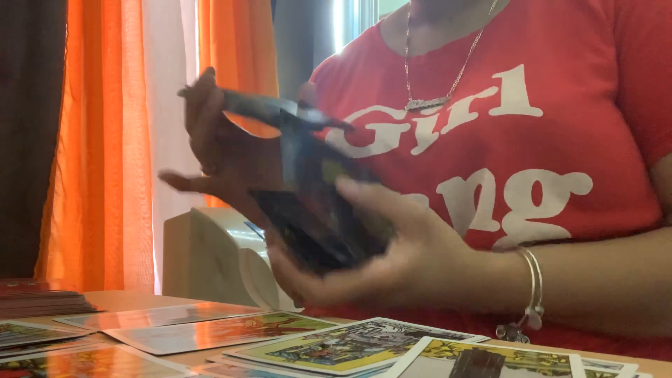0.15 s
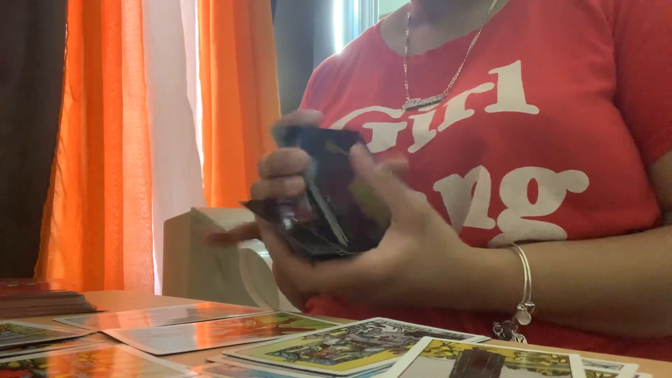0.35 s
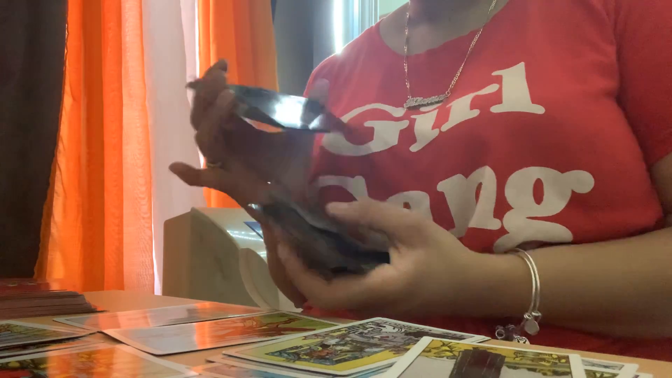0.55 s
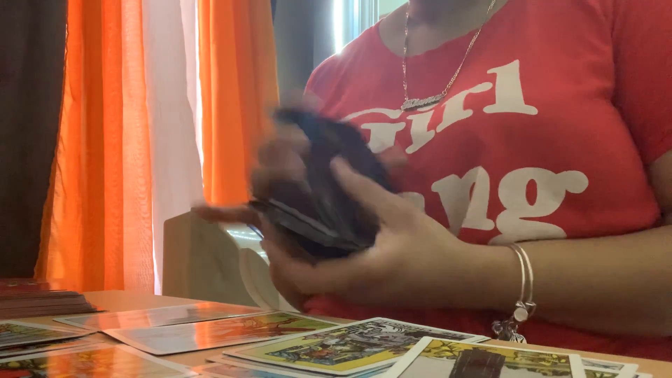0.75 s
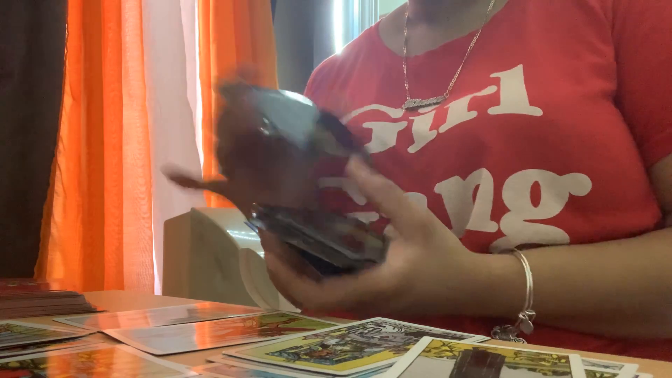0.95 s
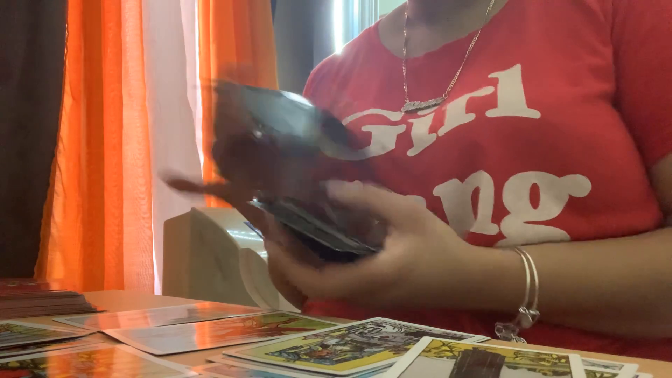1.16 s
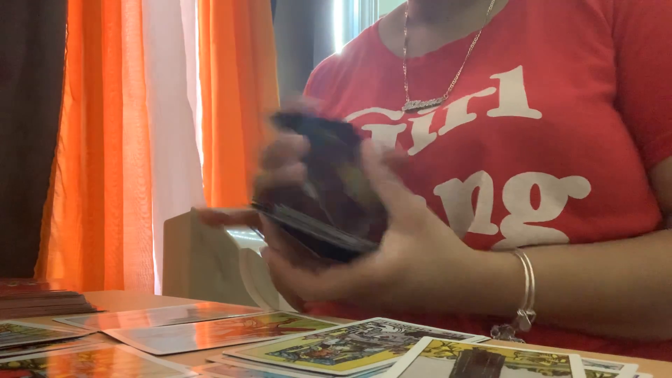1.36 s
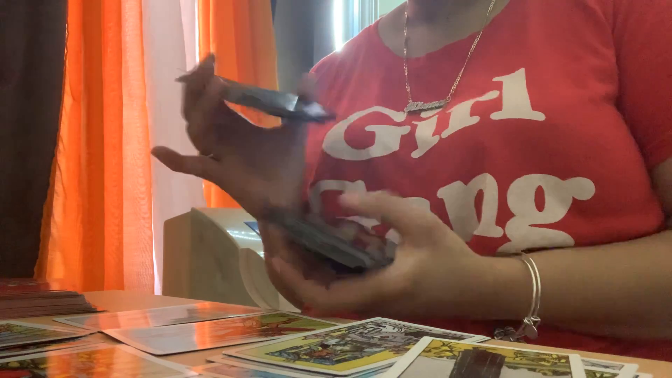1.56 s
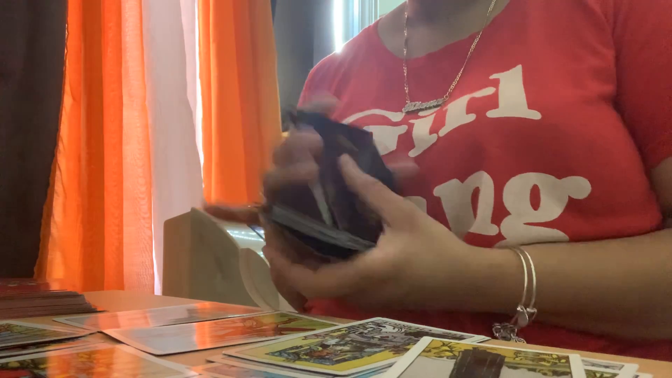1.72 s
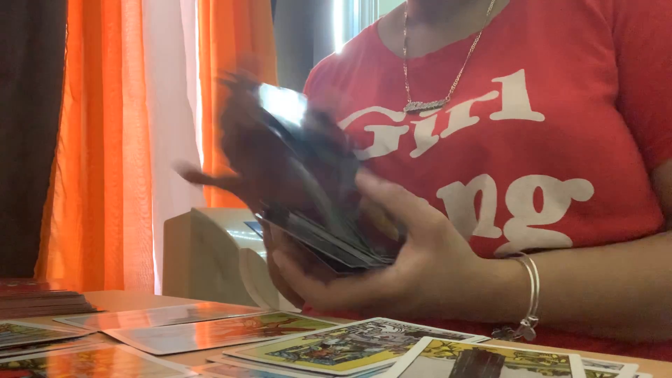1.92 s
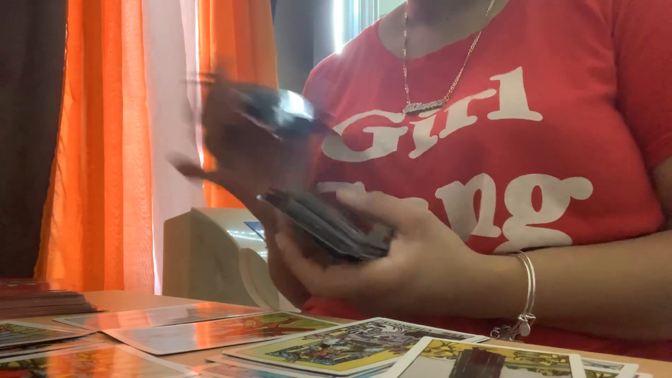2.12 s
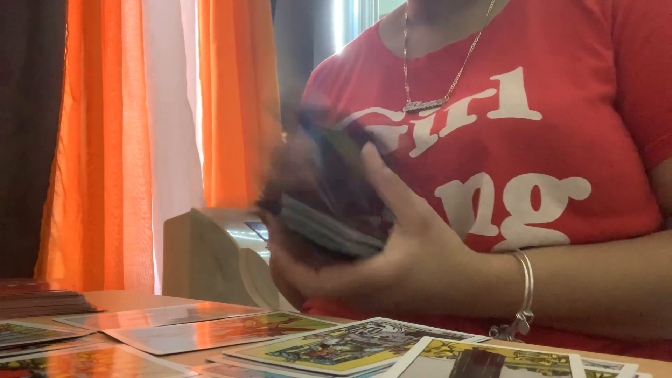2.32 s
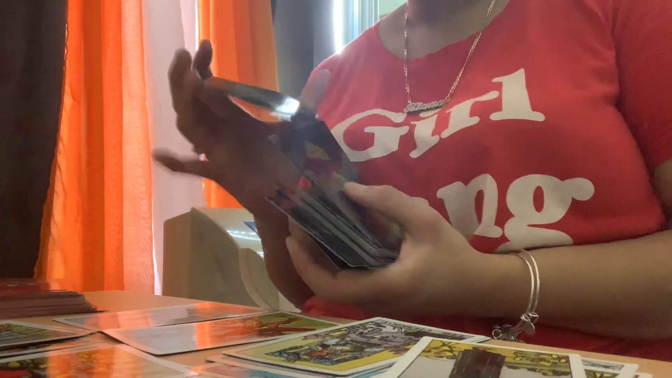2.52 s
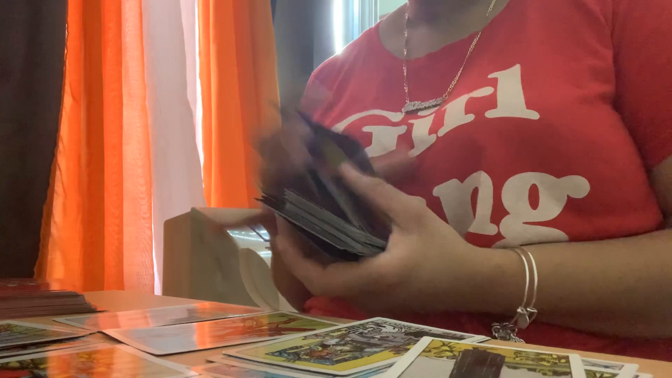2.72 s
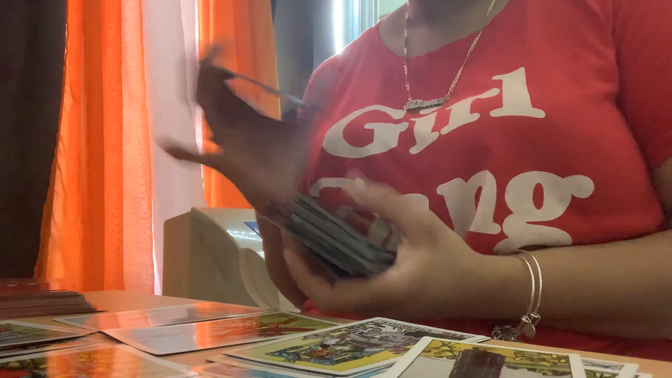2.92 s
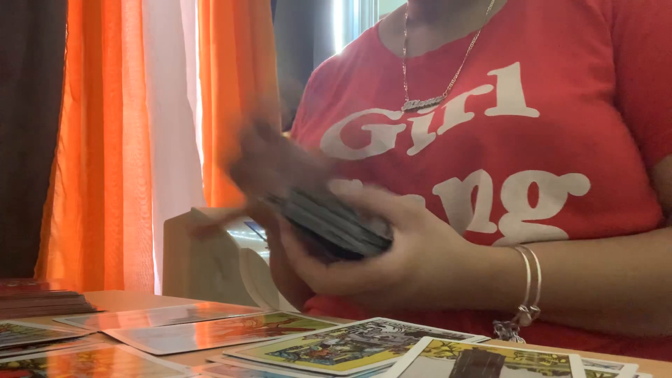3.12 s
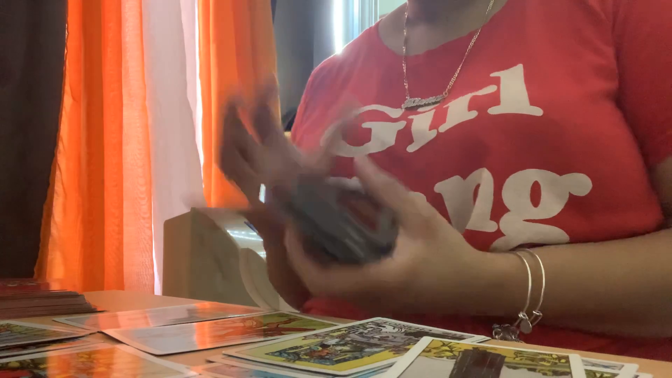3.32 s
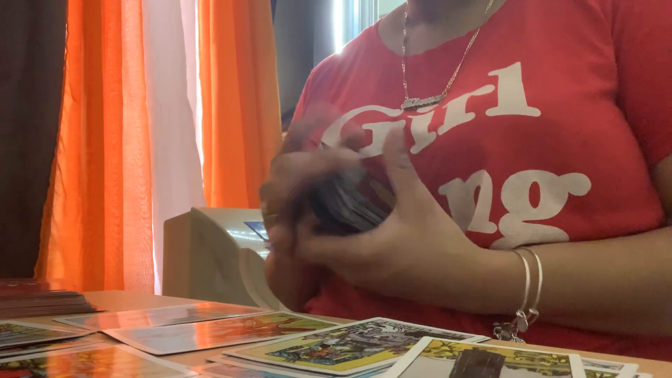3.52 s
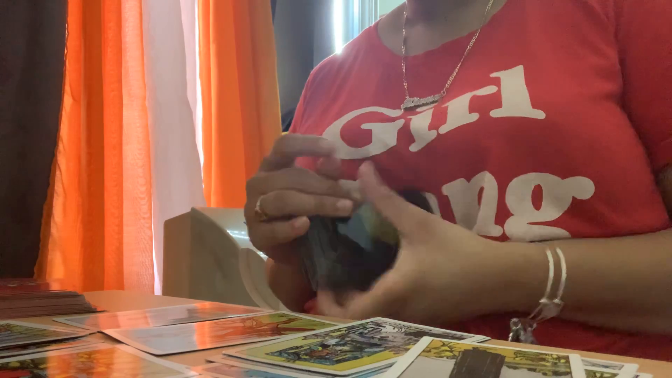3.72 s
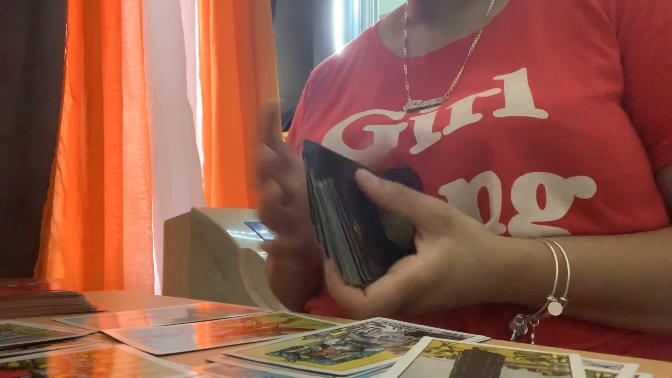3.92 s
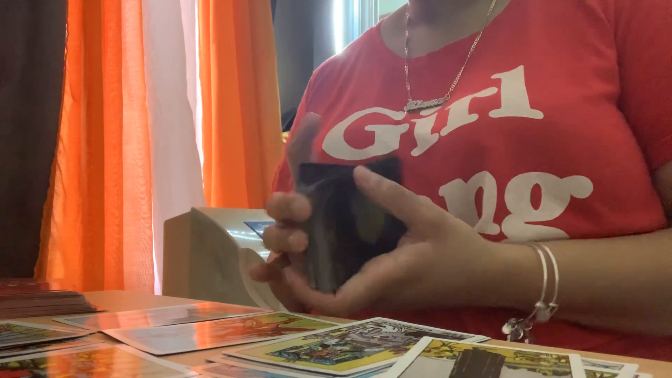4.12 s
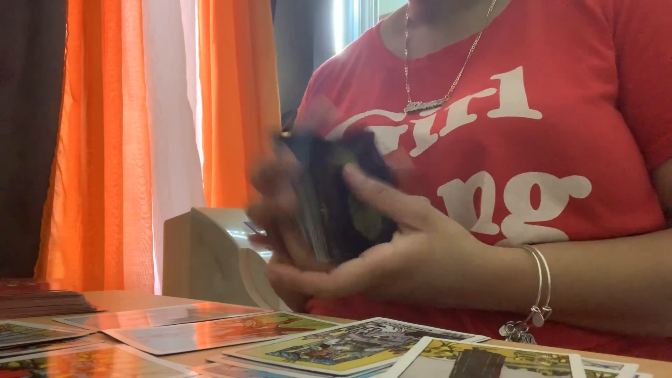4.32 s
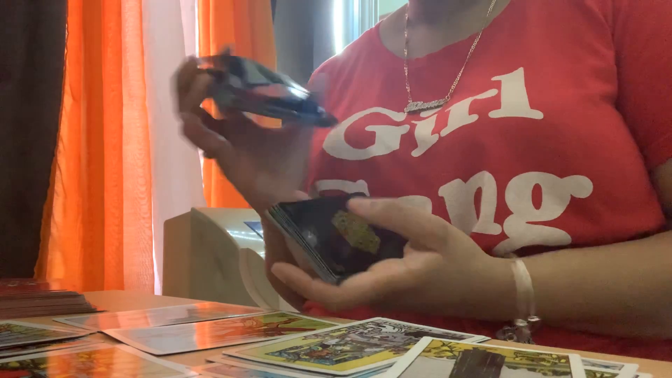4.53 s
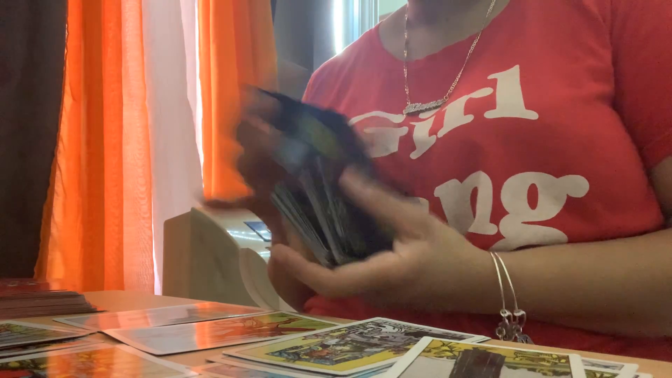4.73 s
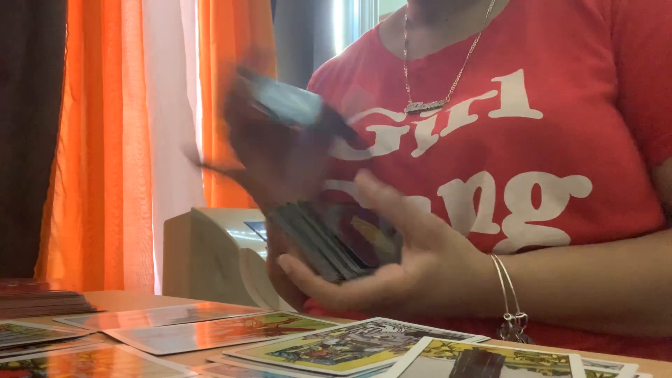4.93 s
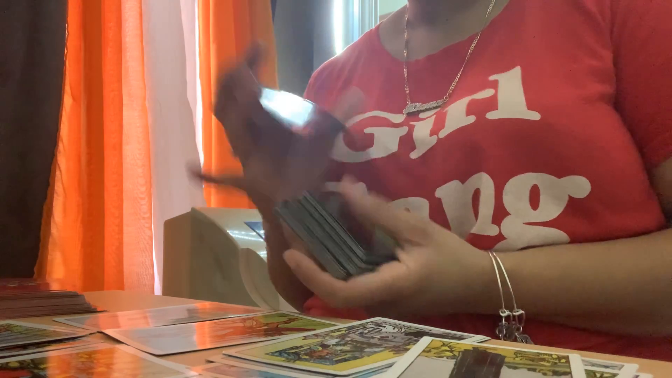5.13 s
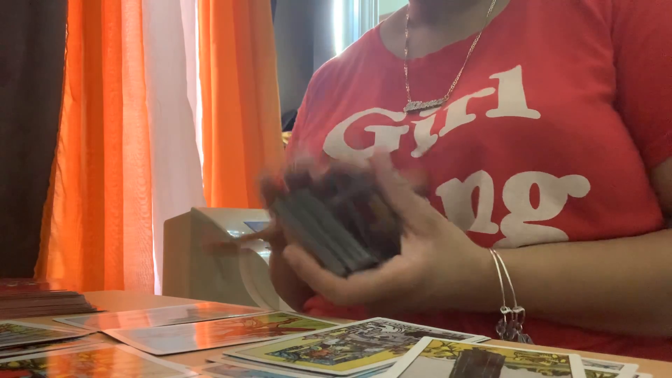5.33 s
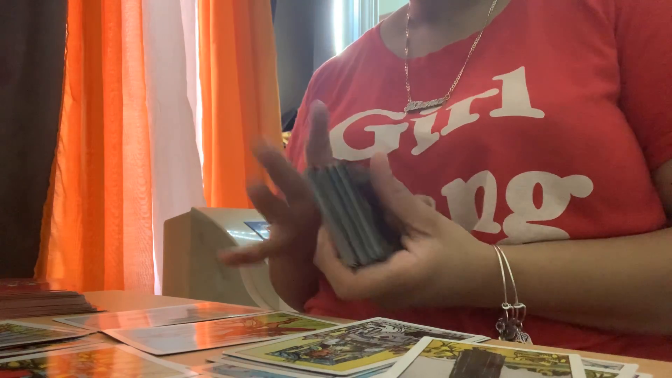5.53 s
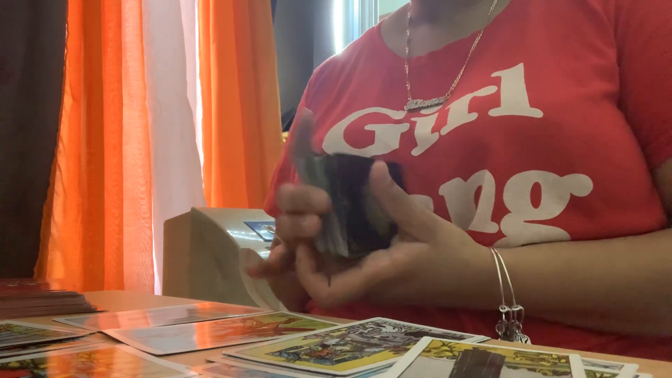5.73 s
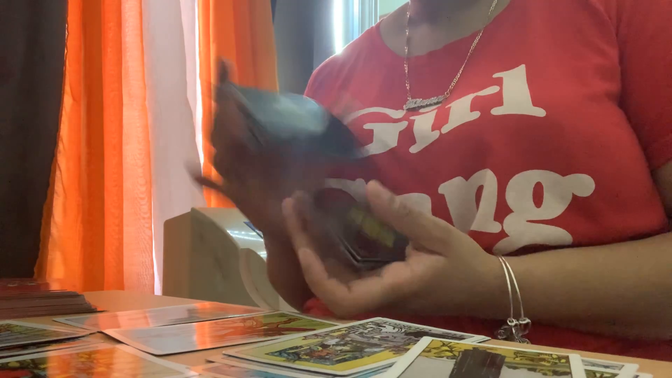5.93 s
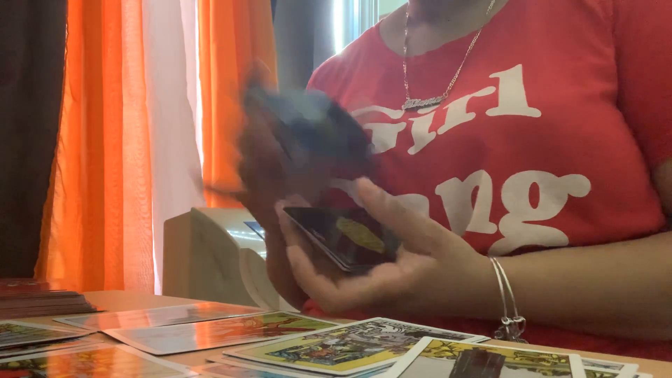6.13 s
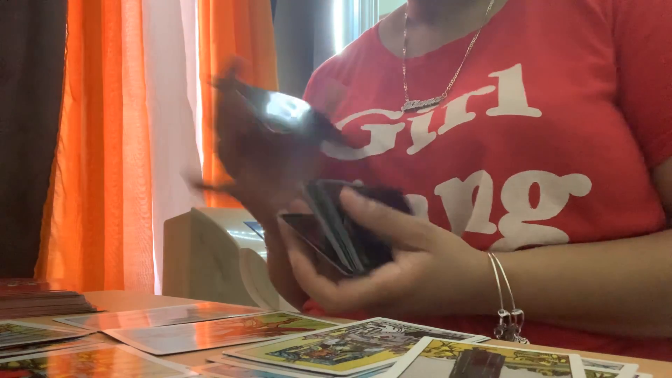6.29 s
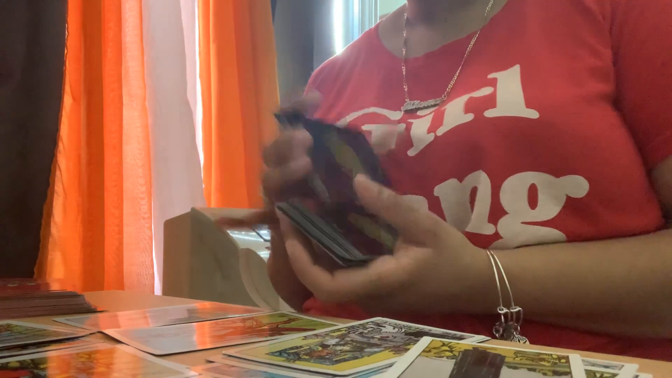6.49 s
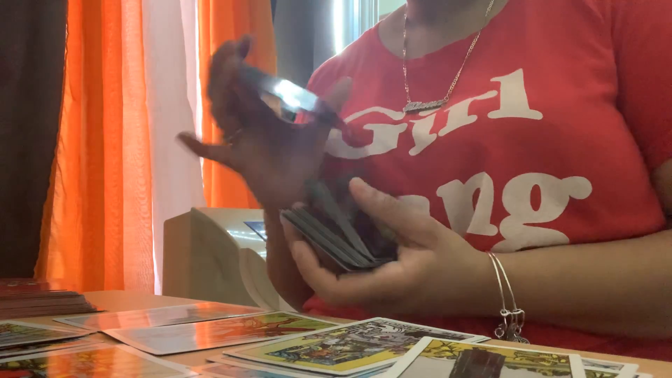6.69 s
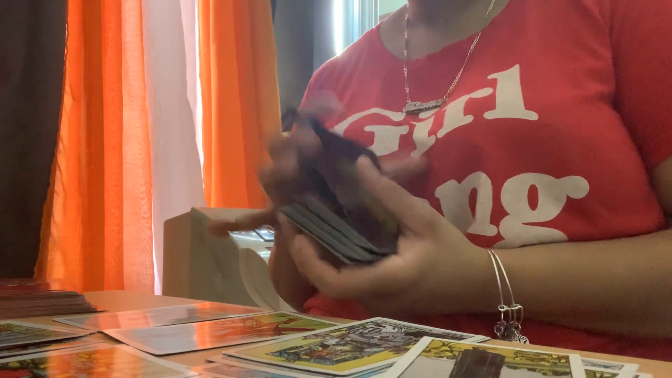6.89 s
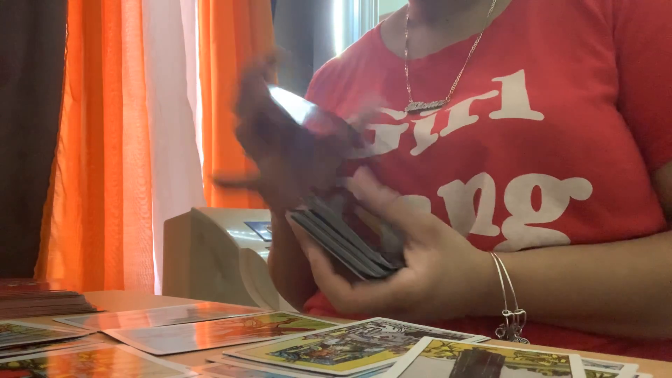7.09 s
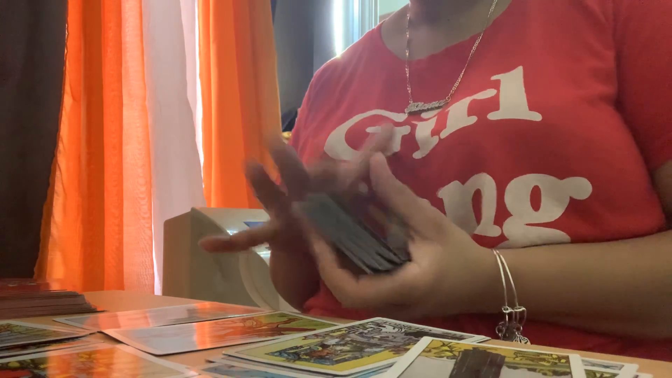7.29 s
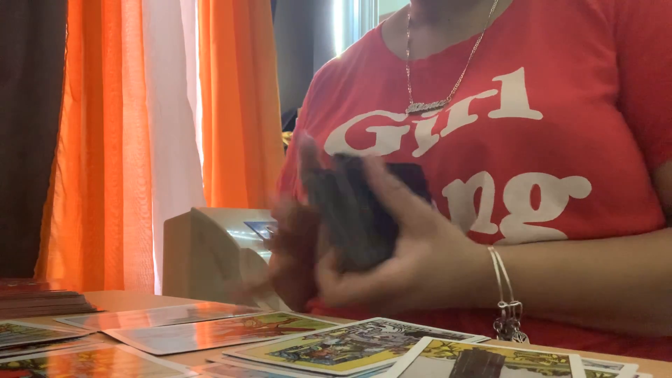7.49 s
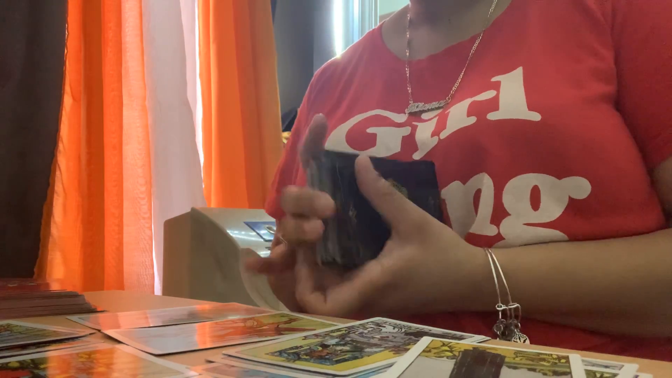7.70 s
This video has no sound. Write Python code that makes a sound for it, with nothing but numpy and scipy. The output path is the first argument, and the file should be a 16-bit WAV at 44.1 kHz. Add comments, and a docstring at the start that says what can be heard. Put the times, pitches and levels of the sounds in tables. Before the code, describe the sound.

A deck of large cards is shuffled overhand, close to the microphone in a small room with little echo. From the start until about 3.2 seconds the strokes come briskly, roughly three a second: a soft drag, a short papery hiss, then a crisp slap with a puff of air. Edges click in between, and now and then the deck thumps softly into the palm. The sharpest slap falls near 1.8 seconds. Another packet lands around 3.6 seconds, followed by a quieter stretch of soft rubs and tiny clicks. Loose cards scrape and patter down near 4.7, 5.1 and 5.4 seconds. After a lull, more packets and clicks come between 6.2 and 7.3 seconds, and the deck is gathered with gentle rubs until about 7.7 seconds. Underneath lie still room air, a faint electrical hum and a slight low rumble of moving arms.

```python
"""Large cards are shuffled overhand, close up in a small room. For the first three seconds the strokes
come briskly: the thumb drags, a packet whips off with a hiss and slaps onto the pile with a puff of air,
and at times the deck thumps into the palm. Then the pace eases: loose cards patter down, edges click
and the deck is squared with soft rubs. A last few packets land after six seconds, and the hands gather
the deck. Under it all lie still air, a faint mains hum and the rumble of moving arms."""
import sys
import numpy as np
from scipy import signal
from scipy.fft import rfft, irfft
from scipy.io import wavfile

SR = 44100
rng = np.random.default_rng(int(sys.argv[2]) if len(sys.argv) > 2 else 0)


def pcm_store(signal):
    """Save signal as 16-bit PCM."""
    levels = np.round(np.clip(np.atleast_2d(signal), -1, 1) * 32767)
    wavfile.write(sys.argv[1], SR, levels.astype(np.int16).T)


N = 341775
TIME = np.arange(N) / SR

# Packets landing flat on the pile. Each row: time in seconds, crack in dB, air pop in dB,
# the pop's nominal pitch in Hz, palm thud in dB.
FLAT_LANDINGS = [(.2656, -41, -50, 1585, -56), (.3505, -60, -45.5, 800, -62),
                 (.3658, -37.5, -41.5, 1014, -52.5), (.5208, -29.5, -35.5, 745, -42),
                 (.6928, -43, -43.5, 1470, -66), (1.0688, -31, -34, 890, -45),
                 (1.1694, -31, -31.5, 1310, -49.5), (1.5002, -34.5, -27.5, 794, -37),
                 (1.8125, -21.5, -34, 850, -50.5), (1.9997, -32.5, -35.5, 1274, -74),
                 (2.7905, -41.5, -35.5, 1530, -50), (3.0738, -48, -42, 1515, -62),
                 (3.1432, -39.5, -41.5, 997, -40.5), (3.1528, -42, -40, 796, -41.5),
                 (3.5675, -44, -37, 880, -77), (3.5755, -54, -41, 796, -54), (4.7708, -53, -42, 853, -49),
                 (5.0686, -39, -38.5, 1524, -46.5), (5.3504, -38, -45, 1265, -53.5),
                 (6.2209, -35.5, -51, 1560, -46.5), (7.2094, -37.5, -40.5, 1470, -49.5),
                 (7.2271, -37.5, -42.5, 1576, -54)]
# Loose cards scraping out of the fingers and tapping down. Each row: start and end in seconds,
# taps in dB, scrape in dB, the scrape's brightness in dB per octave.
LOOSE_LANDINGS = [(0, 0.018, -44.5, -57.5, -11), (0.346, 0.366, -51, -51.5, -10),
                  (1.967, 2.034, -59.5, -58, -1), (3.124, 3.131, -41.5, -47, -7),
                  (3.557, 3.59, -45.5, -53.5, -3), (3.629, 3.77, -63.5, -69.5, 15),
                  (4.397, 4.423, -58.5, -58, -7), (4.705, 4.762, -57, -53, -7),
                  (5.041, 5.071, -40, -38.5, 0), (5.34, 5.388, -51, -54.5, 1.5),
                  (5.964, 5.98, -64.5, -81, -8), (6.22, 6.267, -40.5, -37.5, -3),
                  (6.855, 6.874, -58, -45.5, -6.5), (7.214, 7.238, -53.5, -54, 5)]


def slide_gestures(grip_s=0.02, release_s=0.08, whip_rise_s=0.03, whip_fall_s=0.034, brisk_db=-38):
    """Each move of card on card, as an amplitude envelope and a brightness in dB per octave."""
    # The thumb drags the top cards, then the packet whips away. Each row: grip and fastest moment
    # in seconds, drag in dB, whip in dB, the whip's brightness in dB per octave.
    strokes = [(0.334, 0.501, -57, -52.5, -3), (0.68, 0.828, -59, -39, 0.5), (1.036, 1.147, -58, -39, 0.5),
               (1.384, 1.497, -63, -47.5, 1), (1.7, 1.808, -57.5, -46.5, 1),
               (1.914, 2.086, -54, -37.5, 2.5), (2.346, 2.476, -57.5, -60, 5.5),
               (2.589, 2.765, -61.5, -38.5, -0.5), (3.03, 3.125, -62, -50.5, -2.5),
               (4.29, 4.396, -67.5, -62, -2.5), (6.53, 6.608, -62.5, -53, -5)]
    # The hands gather and square the deck. Each row: start and length in seconds, level in dB,
    # brightness in dB per octave.
    rubs = [(-.04, 0.23, -53.5, -5.5), (0.257, 0.077, -61, -12), (2.621, 0.2, -52.5, -9.5),
            (3.417, 0.13, -64.5, -9), (3.499, 0.13, -54.5, -6.5), (3.654, .16, -60.5, -6.5),
            (3.998, 0.15, -71, -5.5), (4.659, .07, -65.5, -1.5), (4.868, 0.071, -75, -4.5),
            (5.559, 0.086, -72.5, -7), (5.678, 0.051, -75.5, -6.5), (5.818, 0.13, -69.5, -4),
            (6.336, .04, -69, -28), (6.878, 0.065, -63, -5), (7.466, .05, -63.5, -8.5),
            (7.527, 0.049, -60.5, -7.5), (7.593, 0.13, -64.5, -9)]
    for grip, fastest, drag_db, whip_db, bright_db in strokes:
        moments = [grip, grip + grip_s, fastest, fastest + release_s]
        yield from_db(drag_db) * np.interp(TIME, moments, [0, from_db(-0.5), 1, 0]), -7.5
        rise_s = whip_rise_s * 2 ** ((brisk_db - whip_db) / 10.5)   # a softer whip swells more slowly
        swing = np.interp(TIME, [max(fastest - rise_s, grip), fastest, fastest + whip_fall_s], [0, 1, 0])
        yield from_db(whip_db) * np.sin(np.pi / 2 * swing), bright_db
    for start, length, db, bright_db in rubs:
        rub = np.interp((TIME - start) / length, [0, 0.26, 1 - 0.32, 1], [0, 1, 1, 0])
        yield from_db(db) * rub, bright_db
    for start, end, _, db, bright_db in LOOSE_LANDINGS:
        # Loose cards slip faintly before they fall; the scrape thins as the last ones settle.
        peak = start + 0.012
        yield from_db(db - 26.5) * np.interp(TIME, [start - 0.049, start, peak], [0, 1, 0]), -1.7
        scrape = np.interp(TIME, [start, peak, end, end + 0.0074], [0, 1, from_db(-11.5), 0])
        yield from_db(db) * scrape, bright_db


def friction_hiss(catches, brightness, pivot_hz, patchy_db=2.5):
    """Catching card grain hisses in half-octave bands that waver as the card bends."""
    # The colour of friction. Each row: frequency in Hz, spectral level in dB.
    friction_colour = [(150, -21), (400, -10.5), (800, -11), (1200, -3), (2000, -3.5), (3200, 0), (5000, 6),
                       (7500, -5), (10000, 1), (13000, 0), (15500, 4.5)]
    edges = 16500 * 2 ** np.arange(-7, .1, .5)
    hiss, power = 0, 0
    for k, (low, high) in enumerate(zip(edges, edges[1:])):
        hz = np.sqrt(low * high)
        octaves = np.log2(hz / pivot_hz)
        away = octaves if octaves > 0 else 0.15 * min(-octaves, 1)   # dull rubs gather at the pivot
        gain = from_db(at_hz(friction_colour, hz) + brightness * away) * np.sqrt(high - low)
        gain *= from_db(patchy_db * drift(70))
        hiss += gain * rms_one(band(catches[k % 2], low, high))
        power += gain ** 2
    return hiss / np.sqrt(power)


def slides(catches_per_s=26000, snags_per_s=140, snag_s=0.0013, fast_db=-39, judder_db=2,
           sing_hz=5400, sing_width_hz=1500, rasp_hz=3100, rasp_width_hz=1000):
    """Card slides on card: the grain catches, edges snag, a fast slide sings and a slow one rasps."""
    power, brightness = np.full(N, 1e-14), np.zeros(N)
    for amplitude, bright_db in slide_gestures():
        power += amplitude ** 2
        brightness += amplitude ** 2 * bright_db
    brightness /= power
    level_db = 10 * np.log10(power)
    t = TIME[:SR // 100]
    snags = signal.fftconvolve(grains(snags_per_s, spread_db=5), swell(t, snag_s))[:N]
    snags = from_db(-6) * rms_one(snags)
    snags /= 1 + from_db(level_db - fast_db + 6.5)   # a fast slide rides over the edges
    catches = [grains(catches_per_s, spread_db=4.5) * np.sqrt(1 + snags ** 2) for _ in range(2)]
    hiss = friction_hiss(catches, brightness, rasp_hz)
    sing = noise_band(N, sing_hz - sing_width_hz / 2, sing_hz + sing_width_hz / 2)
    sing *= from_db(-2 + np.minimum(level_db - fast_db, 0))
    dullness = np.interp(brightness, [-12, -6], [1, 0])
    grit = band(grains(2500, spread_db=6.5), rasp_hz - rasp_width_hz / 2, rasp_hz + rasp_width_hz / 2)
    rasp = from_db(-2) * dullness * rms_one(grit)
    return (hiss + sing + rasp) * from_db(level_db + judder_db * drift(350) + 4)


def impacts(flat_treble_db=-15, click_pop_hz=1103, spread_octaves=0.45):
    """Each flat landing and edge click; an edge traps little air and hardly moves the palm."""
    # A card's edge clicks on the pile. Each row: time in seconds, crack in dB,
    # treble in dB against the crack.
    edge_clicks = [(.191, -45.5, -21), (.3604, -43, -29), (.7621, -37.5, -20), (.8513, -31, -20),
                   (1.0627, -42, -7.5), (1.4136, -41, -14), (1.7225, -40.5, -12), (1.9958, -35.5, -8),
                   (2.3615, -45.5, -9), (2.3809, -34, -8), (2.4041, -37.5, -27), (2.4189, -34, -15),
                   (2.4334, -38.5, -11), (3.0508, -42, -16.5), (3.0893, -30.5, -9.5), (3.8181, -47.5, -15),
                   (3.833, -45, -6), (3.9105, -55.5, -28), (4.011, -61, -14), (4.0761, -55, -5),
                   (4.218, -62, -14), (4.474, -60, -21), (4.7176, -41.5, -13), (4.7275, -35, -27),
                   (4.7414, -40, -15), (6.2428, -39, -21), (6.2628, -42, -3), (6.5641, -41, -24),
                   (6.6025, -40, -31), (6.8319, -53, -20), (6.8632, -47, 6.5), (6.916, -49, -22),
                   (6.9482, -52, 1.5), (6.9537, -48, 2.5), (6.9812, -43, -17)]
    for s, crack_db, pop_db, pop_hz, thud_db in FLAT_LANDINGS:
        yield s, crack_db, flat_treble_db, pop_db, pop_hz, thud_db
    for s, crack_db, treble_db in edge_clicks:
        pop_hz = click_pop_hz * 2 ** (spread_octaves * rng.standard_normal())
        yield s, crack_db, treble_db, crack_db - 12.5, pop_hz, crack_db - 16


def slaps(crack_s=0.0011, pop_s=0.0018, thud_s=0.0041, thud_hz=290, flex_ratio=2.2,
          start_ratio=1.592, end_ratio=0.32, fall_s=0.00476):
    """Edges crack, air pops from between the closing packets and the palm takes the blow."""
    # The colour of the crack. Each row: frequency in Hz, spectral level in dB.
    crack_colour = [(200, -21.5), (800, 0), (1400, -5), (2000, -0.5), (3500, 4), (5500, 2.5), (8000, -21.5),
                    (16000, -48)]
    t = TIME[:SR // 20]
    # Pop and thud dive through their nominal pitch.
    pitch_ratio = end_ratio + (start_ratio - end_ratio) * np.exp(-t / fall_s)
    glide = 2 * np.pi * np.cumsum(pitch_ratio) / SR
    cracks, layers = np.zeros(N), np.zeros(N)
    for s, crack_db, treble_db, pop_db, pop_hz, thud_db in impacts():
        # Many edges of like weight land within a moment.
        taps, fine_taps = np.tanh(1.5 * rng.standard_normal((2, len(t)))) * swell(t, crack_s)
        flex = band(taps, flex_ratio * pop_hz / 2, flex_ratio * pop_hz)   # stiffer packets clack higher
        add(cracks, s, from_db(crack_db) * burst(taps + 0.25 * flex))
        add(layers, s, from_db(crack_db + treble_db) * burst(band(fine_taps, 6000, 20000)))
        air = np.sin(pop_hz * glide) + 0.71 * noise_band(len(t), 500, 2200)
        add(layers, s + 0.0003, from_db(pop_db) * burst(air * swell(t, pop_s)))
        palm = np.sin(thud_hz * glide) + noise_band(len(t), 160, 560)
        add(layers, s + 0.002, from_db(thud_db + 0.5) * burst(palm * swell(t, thud_s)))
    return from_db(-3.5) * coloured(cracks, crack_colour) + from_db(0.04) * layers


def patter(taps_per_s=1800, fade_s=0.0039, clump_db=3, flutter_db=-12.5, flutter_s=0.014):
    """Loose edges tap the pile in quick uneven runs; outer cards flutter after a flat landing."""
    # The colour of card edges. Each row: frequency in Hz, spectral level in dB.
    edge_colour = [(100, -12), (250, -8), (480, -4.5), (720, 0), (1200, -5.5), (1800, -0.5), (3500, -1.5),
                   (7000, -5.5), (16000, -32)]
    level = np.zeros(N)
    for start, end, db, *_ in LOOSE_LANDINGS:
        level += from_db(db) * np.clip(np.minimum(TIME - start, end - TIME) / fade_s + .5, 0, 1)
    for s, crack_db, *_ in FLAT_LANDINGS:
        level += from_db(crack_db + flutter_db) * np.interp(TIME, [s, s + flutter_s], [1, 0], left=0)
    taps = grains(taps_per_s, spread_db=2)
    clumps = rms_one(from_db(clump_db * drift(400)))
    return coloured(level * taps * clumps, edge_colour)


def palm_thumps(start_hz=700, end_hz=105, fall_s=0.00637, swell_s=0.0066, breath=0.22):
    """The deck presses air out of the cupped palm: a short, breathy tone that drops in pitch."""
    # The deck sinks into the hand. Each row: time in seconds, level in dB.
    thumps = [(1.068, -45), (1.419, -47), (1.726, -45.5), (2.378, -45), (2.427, -47), (3.151, -40.5)]
    t, out = TIME[:SR // 20], np.zeros(N)
    turns = np.cumsum(end_hz + (start_hz - end_hz) * np.exp(-t / fall_s)) / SR
    for s, db in thumps:
        air = np.sin(2 * np.pi * turns) + breath * noise_band(len(t), 120, 700)
        add(out, s, from_db(db) * burst(air * t * np.exp(-(t / swell_s / 2) ** 2)))
    return out


def squeaks(width_hz=260):
    """A glossy face sticks and slips, keeping the card ringing faintly in a narrow band."""
    # Each row: start and length in seconds, pitch in Hz, level in dB.
    sticky_slips = [(2.786, 0.098, 1450, -55.5), (4.54, 0.082, 2340, -73.5), (7.218, .1, 1990, -71.5)]
    out = np.zeros(N)
    for start, length, hz, db in sticky_slips:
        tone = noise_band(N, hz - width_hz / 2, hz + width_hz / 2)
        envelope = np.interp(TIME, [start, start + length / 4, start + length], [0, 1, 0])
        out += from_db(db) * tone * envelope
    return out


def room(x, first_wall_s=0.0055, build_s=0.00057):
    """Near surfaces answer at once, then a short diffuse tail dies away."""
    # Bounces off the table top and the body. Each row: delay in milliseconds, gain as a factor.
    reflections = [(1.15, 0.029), (2.5, 0.047), (4.4, 0.092)]
    # The tail's length. Each row: frequency in Hz, seconds to fall by 60 dB.
    decay_times = [(150, 0.32), (700, 0.23), (2000, 0.3), (5000, .28), (9000, 0.2), (15000, 0.49)]
    # The tail's colour. Each row: frequency in Hz, level in dB.
    tail_colour = [(150, -2), (700, -5.5), (2000, -11), (5000, -11.5), (9000, -7.5), (15000, -21)]
    t = TIME[:SR // 2]
    response = np.zeros(len(t))
    response[0] = 1
    for ms, gain in reflections:
        response[round(ms * SR / 1000)] += gain
    edges = 80 * 2 ** np.arange(9)
    onset = np.clip((t - first_wall_s) / build_s, 0, 1)
    for low, high in zip(edges, edges[1:]):
        hz = np.sqrt(low * high)
        tail = noise_band(len(t), low, high) * onset * from_db(-60 * t / at_hz(decay_times, hz))
        tail *= np.sqrt(2 * (high - low) / SR / np.sum(tail ** 2))   # as strong as the direct band
        response += from_db(at_hz(tail_colour, hz)) * tail
    return signal.fftconvolve(x, response)[:N]


def background(hum_hz=60, hum_db=-75):
    """A bed of still room air, mains hum and the rumble of moving hands and arms."""
    # The room tone. Each row: frequency in Hz, spectral level in dB.
    air_colour = [(15, -37), (25, -11.5), (82, -0.5), (166, -13), (309, -16.5), (476, -19), (516, -19.5),
                  (695, -20), (775, -22), (1070, -22.5), (1480, -27), (1610, -29), (5430, -34.5),
                  (7110, -35), (16000, -50.5)]
    # The rumble of the hands. Each row: time in seconds, level in dB.
    handling = [(0, -67), (1, -67), (1.7, -59), (2.2, -69.5), (2.7, -63.5), (3.3, -74.5), (4, -67.5),
                (4.5, -71.5), (7.75, -77)]
    air = from_db(-68.5 - 2) * rms_one(coloured(rng.standard_normal(N), air_colour))
    hum = from_db(hum_db) * np.sqrt(2) * np.sin(2 * np.pi * hum_hz * TIME)
    rumble = from_db(np.interp(TIME, *np.transpose(handling))) * noise_band(N, 58, 135)
    return air + hum + rumble


def from_db(db):
    return 10 ** (np.asarray(db) / 20)


def rms_one(x):
    return x / np.sqrt(np.mean(x ** 2) + 1e-20)


def burst(x):
    """Give a short sound the energy of 4 ms at rms 1."""
    return x / np.sqrt(np.sum(x ** 2) / (.004 * SR) + 1e-20)


def swell(t, peak_s):
    """An envelope that rises until peak_s and dies away."""
    return t * np.exp(-t / peak_s)


def at_hz(points, hz):
    """Read a curve on a log-frequency axis."""
    frequencies, values = np.transpose(points)
    return np.interp(np.log(np.maximum(hz, 1)), np.log(frequencies), values)


def add(out, s, sound):
    """Mix a sound in at s seconds."""
    i = max(round(s * SR), 0)
    out[i:i + len(sound)] += sound[:N - i]


def band(x, low_hz, high_hz):
    sos = signal.butter(2, [low_hz, min(high_hz, .45 * SR)], "band", fs=SR, output="sos")
    return signal.sosfilt(sos, x)


def noise_band(samples, low_hz, high_hz):
    return rms_one(band(rng.standard_normal(samples), low_hz, high_hz))


def coloured(x, spectrum, size=8192):
    """Minimum-phase EQ of the given colour; white noise keeps its power."""
    gain = rms_one(from_db(at_hz(spectrum, np.fft.rfftfreq(size, 1 / SR))))
    cepstrum = irfft(np.log(gain))
    cepstrum[1:size // 2] *= 2
    cepstrum[size // 2 + 1:] = 0
    return signal.fftconvolve(x, irfft(np.exp(rfft(cepstrum))))[:len(x)]


def drift(per_s):
    """A random wobble at rms 1, renewed so many times a second."""
    return rms_one(np.interp(TIME * per_s, np.arange(N), rng.standard_normal(N)))


def grains(per_s, spread_db):
    """Tiny contacts at random moments, of random size and sign."""
    sizes = from_db(spread_db * np.clip(rng.standard_normal(N), -2, 2)) * rng.choice([-1, 1], N)
    return rms_one(sizes * (rng.random(N) < per_s / SR))


def scene():
    """The cards sound through the cupped hands into the room, over the quiet bed."""
    # The hollow of the hands. Each row: frequency in Hz, relative gain in dB.
    hand_colour = [(150, 0), (255, -3.5), (345, 1), (530, -0.5), (680, 3.5), (900, 3), (1100, -2),
                   (1400, -1.5), (1750, 2), (2400, 1), (3000, 0), (5000, -4.5), (7800, 3.5), (10000, 0),
                   (16000, 2.5)]
    cards = coloured(slides() + slaps() + patter() + palm_thumps() + squeaks(), hand_colour)
    return (room(cards) + background())[None]


def record(dry, low_cut_hz=42, high_cut_hz=16200):
    """The microphone drops the deepest bass; the top is cut steeply."""
    thin = signal.sosfilt(signal.butter(3, low_cut_hz, "high", fs=SR, output="sos"), dry)
    return signal.sosfilt(signal.ellip(12, .2, 70, high_cut_hz, fs=SR, output="sos"), thin)


dry = scene()
out = record(dry)
pcm_store(out)
```